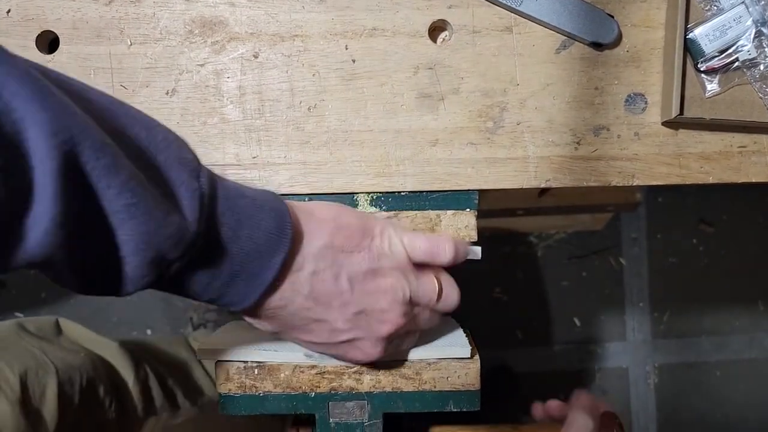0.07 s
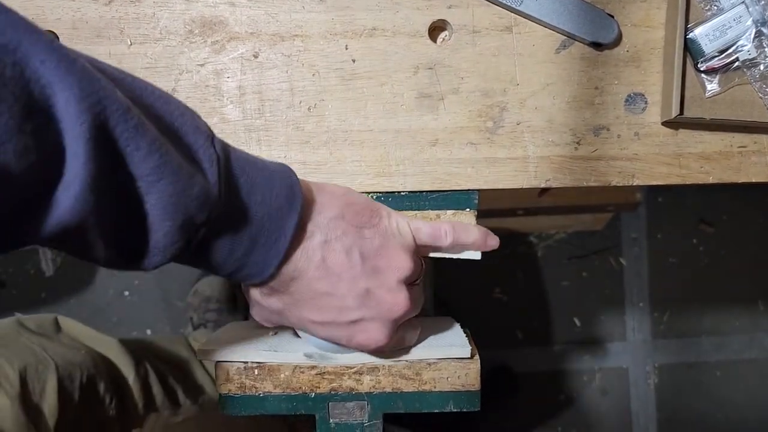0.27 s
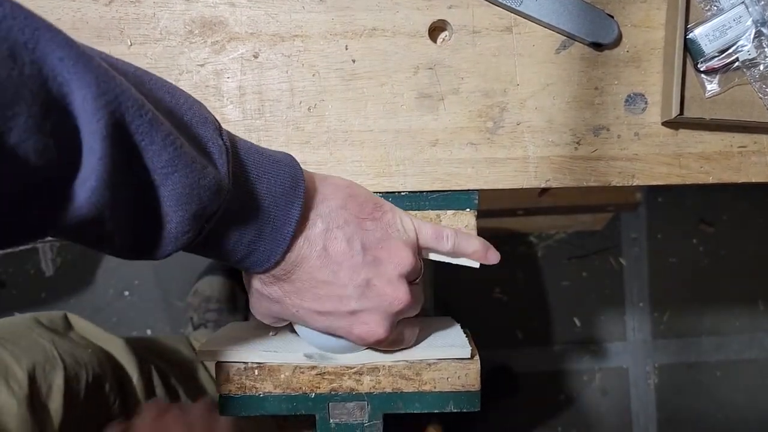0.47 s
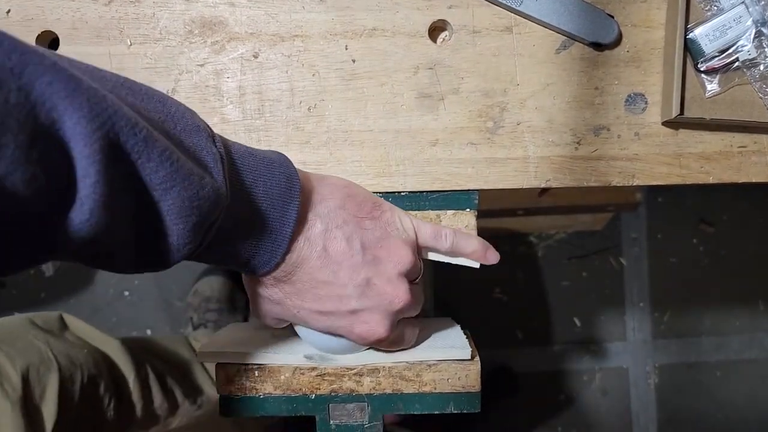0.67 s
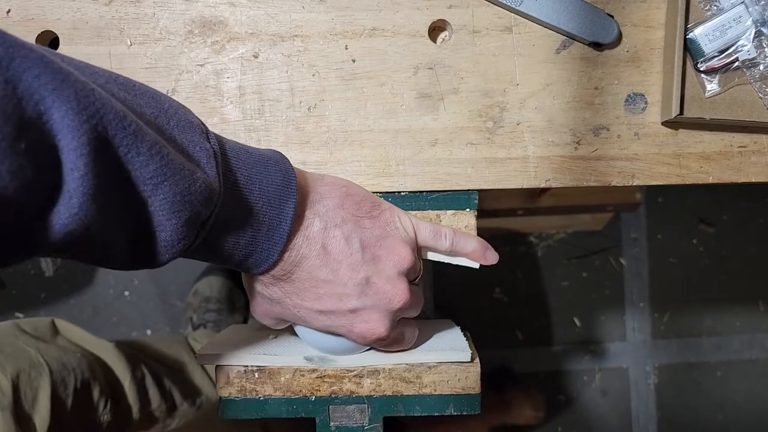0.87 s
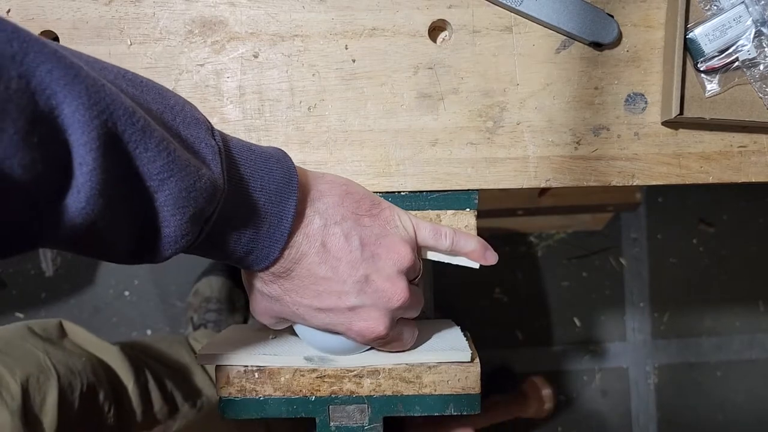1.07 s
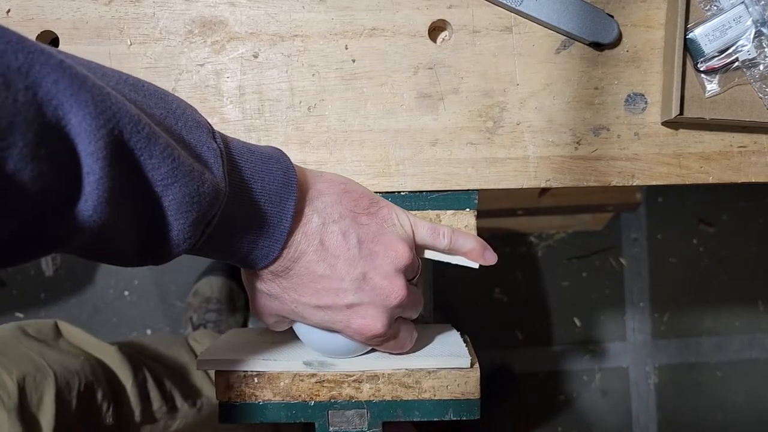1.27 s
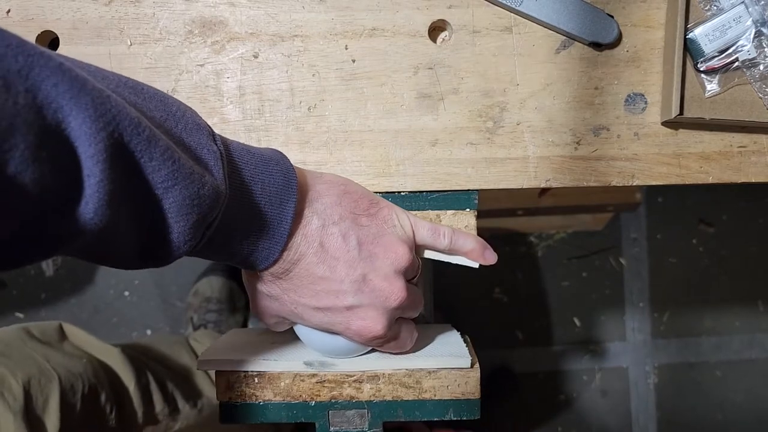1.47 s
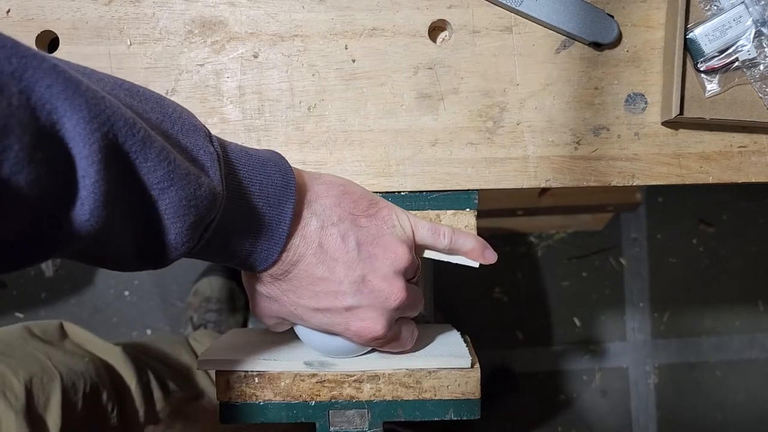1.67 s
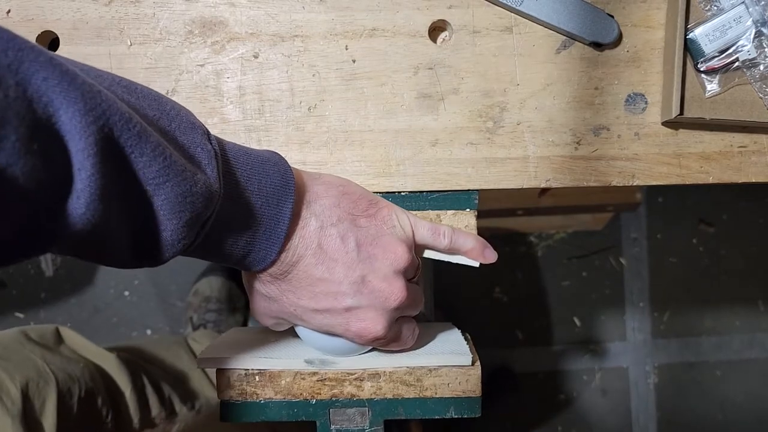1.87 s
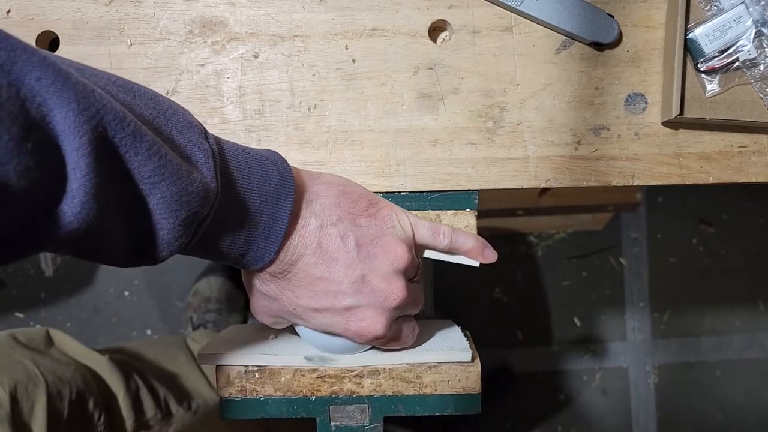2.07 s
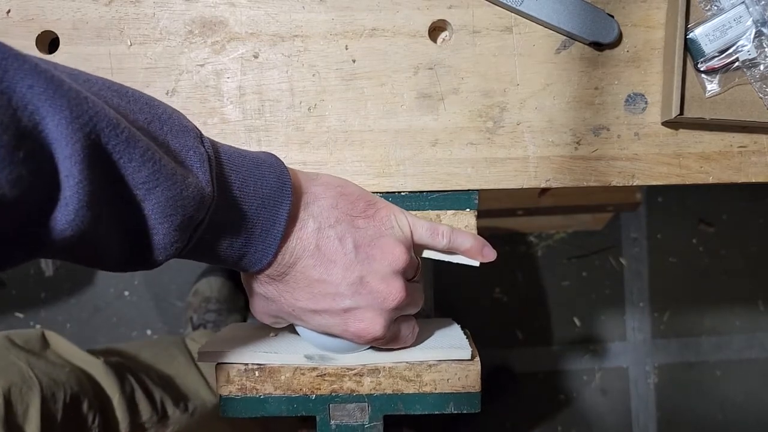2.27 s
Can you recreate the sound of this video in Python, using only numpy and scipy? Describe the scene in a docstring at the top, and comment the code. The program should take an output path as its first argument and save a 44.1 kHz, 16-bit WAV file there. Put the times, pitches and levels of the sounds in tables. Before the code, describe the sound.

A wooden bench vise is wound shut, its loose screw clunking and grinding with a brief high squeak. A hard plastic ball snaps between the jaws, then the grinding fades. A sleeve rustles close by in a small, humming workshop.

```python
"""A wooden bench vise is wound shut on a hard plastic ball in a small workshop.
A sleeve rustles close by over a low steady hum. From 0.2 s the loose screw and jaw clunk and rattle
at each turn and set the bench booming, while the dry thread grinds and squeaks, loudest at 0.75 s.
Between 1.6 and 1.8 s the ball snaps into a new seat three times, its shell ringing briefly.
The grinding then dies away, and one faint knock ends the scene."""
import sys
import numpy as np
from scipy import signal
from scipy.fft import rfft, irfft
from scipy.io import wavfile

SR = 44100
rng = np.random.default_rng(int(sys.argv[2]) if len(sys.argv) > 2 else 0)


def materialize(psi):
    """Save the field psi as 16-bit PCM at rate SR to the path in sys.argv[1].

    A 1-D psi becomes a single channel; in a 2-D psi each row is a channel.
    """
    bounded = np.clip(np.atleast_2d(psi).T, -1, 1)
    quanta = np.round(bounded * 32767).astype(np.int16)
    wavfile.write(sys.argv[1], SR, quanta)


N = 101429

# Knocks of the loose screw and jaw: start_s, thump_db, body_db, clack_db, clack_hz, rattle_s
KNOCKS = [(.216, -45, -29.5, -26.5, 1740, 0.0068), (.226, -24, -22.5, -13.5, 1620, .0025),
          (.251, -41, -28.5, -21.5, 2080, 0.003), (.266, -25, -13, -15.5, 1080, .0024),
          (.293, -25.5, -36.5, -21.5, 1750, 0.0022), (0.459, -34.5, -37, -19, 3050, 0.0026),
          (.478, -21.5, -18.5, -15.5, 1250, 0.0032), (.546, -27, -33, -24.5, 990, 0.003),
          (.792, -29, -48, -33, 1530, 0.0024), (0.826, -32, -46, -40.5, 1010, .0061),
          (.856, -25.5, -36.5, -29, 1310, .0023), (.878, -46, -32.5, -26.5, 1430, 0.0035),
          (.974, -25, -32.5, -24, 1200, .007), (1.021, -31.5, -31, -35.5, 830, 0.0078),
          (1.113, -57, -52, -35, 1060, 0.0018), (1.183, -26.5, -27, -23.5, 1450, 0.0071),
          (1.212, -28.5, -42.5, -34, 1420, 0.0045), (1.229, -25.5, -22.5, -20, 2050, .0035),
          (1.315, -44.5, -35, -38.5, 1270, .0056), (1.392, -33.5, -37.5, -37.5, 800, 0.0015),
          (1.4987, -33.5, -43.5, -21, 1017, 0.0034), (1.54, -33, -44.5, -29, 800, 0.0027),
          (1.56, -29, -29.5, -28.5, 1020, 0.0069), (1.62, -33.5, -27, -17, 1850, 0.0018),
          (1.631, -22, -26, -20, 1210, 0.0072), (1.661, -24, -35, -28, 1600, 0.0073),
          (1.697, -30.5, -30.5, -26, 1760, .005), (1.771, -37.5, -33.5, -19, 2340, .0012),
          (1.802, -46, -37.5, -33, 1420, 0.0074), (1.8373, -33, -30, -23, 1570, 0.0017),
          (1.914, -50.5, -35.5, -39, 1380, 0.00363), (2.239, -43.5, -53.5, -62, 1343, 0.0014)]


def amp(db):
    """Decibels to gain."""
    return 10 ** (np.asarray(db) / 20)


def unit_rms(x):
    """Scales a signal to rms 1."""
    return x / np.sqrt(np.mean(x ** 2) + 1e-20)


def curve_at(points, hz):
    """Reads a curve on a log-frequency axis."""
    f, value = np.transpose(points)
    return np.interp(np.log(hz + 1), np.log(f + 1), value)


def fader(points):
    """Gain over time from points of time_s, level_db."""
    return amp(np.interp(np.arange(N) / SR, *np.transpose(points)))


def add(mix, start_s, sound):
    """Mixes a sound in at its start time."""
    part = mix[..., max(round(start_s * SR), 0):][..., :sound.shape[-1]]
    part += sound[..., :part.shape[-1]]


def convolve(x, response):
    """Plays each channel through an impulse response."""
    return signal.fftconvolve(np.atleast_2d(x), np.atleast_2d(response), axes=1)[:, :N]


def colour(x, eq, peaks=(), size=8192):
    """Minimum-phase EQ of unit energy: a broad curve with resonances on top."""
    hz = abs(np.fft.fftfreq(size, 1 / SR))
    resonances = sum(amp(db) / (1 + (2 * (hz - f) / width) ** 2) for f, width, db in peaks)
    gain = amp(curve_at(eq, hz)) * (1 + resonances)
    response = np.fft.ifft(np.exp(np.conj(signal.hilbert(np.log(gain))))).real[:size // 2]
    return convolve(x, response / np.linalg.norm(response))


def grains(size, spread_db):
    """Mid and side noise made of tiny contacts of uneven strength."""
    return unit_rms(rng.standard_normal((2, size)) * amp(spread_db * rng.standard_normal(size)))


def wander(size, rate_hz):
    """Smooth random motion of rms 1."""
    rolloff = 1 + (np.fft.rfftfreq(size, 1 / SR) / rate_hz) ** 4
    return unit_rms(irfft(rfft(rng.standard_normal(size)) / rolloff, size))


def ring(modes):
    """Impulse response of a set of decaying modes."""
    t = np.arange(SR) / SR
    return sum(amp(db - 60 * t / t60) * np.cos(2 * np.pi * hz * t) for hz, db, t60 in modes)


def room_tone():
    """A low steady hum over the air of the room."""
    # Partials of the hum: pitch_hz, level_db
    hum = [(47, -49.5), (99, -61.5)]
    # Colour of the air: freq_hz, gain_db
    air_eq = [(20, -7), (130, 9), (700, -43), (2000, -69.5), (16000, -50.5)]
    t = np.arange(N) / SR
    out = amp(-59) * colour(rng.standard_normal((2, N)), air_eq)
    out[0] += sum(amp(db) * unit_rms(np.sin(2 * np.pi * (hz * t + rng.random()))) for hz, db in hum)
    return out


def workshop_reverb(send):
    """Reverb of a small room: two noise tails slowly cross-faded so its colour varies."""
    # Decay of the room: freq_hz, t60_s
    decay = [(60, 0.15), (200, 0.36), (4000, 0.47), (16000, 0.12)]
    fade_in = np.minimum(np.arange(SR) / SR / 0.0075, 1)
    out = 0
    for blend in (np.sin, np.cos):
        hz, t, bands = signal.stft(rng.standard_normal((2, SR)), SR, nperseg=256)
        bands *= amp(-60 * t / curve_at(decay, hz)[:, None])
        tail = signal.istft(bands, SR, nperseg=256)[1][:, :SR] * fade_in
        feed = send[0] * blend(np.pi * np.arange(N) / SR)
        out = out + convolve(feed, amp(-13) * tail / np.linalg.norm(tail[0]))
    return out


def sleeve_rustle():
    """Cloth fibres rub with a soft, fluttering hiss."""
    # Swells of the rustle: time_s, level_db
    swells = [(0, -67), (.29, -55.5), (.37, -66), (.53, -58), (.68, -70.5), (.87, -63), (1.29, -60),
              (1.38, -80), (1.49, -86), (1.68, -50.5), (1.8, -90.5), (1.85, -59.5), (1.99, -61),
              (2.09, -70.5), (2.3, -72.5)]
    # Colour of the cloth: freq_hz, gain_db
    cloth_eq = [(200, 10), (2000, 2.5), (7500, 3.5), (16000, -11.5)]
    flutter = unit_rms(amp(0.62 * wander(N, rate_hz=41)))
    return colour(grains(N, spread_db=2) * flutter * fader(swells), cloth_eq)


def screw_grind():
    """The turning screw grinds unevenly through the bench."""
    # Swells of the grinding: time_s, level_db
    swells = [(0, -79), (.2, -51), (.3, -32), (.42, -39.5), (.58, -31.5), (.73, -38.5), (.87, -35.5),
              (1.28, -39), (1.48, -51), (1.58, -31.5), (1.98, -38), (2.08, -54), (2.3, -58.5)]
    # Colour of the grinding: freq_hz, gain_db
    grind_eq = [(40, -35), (95, -5.5), (180, 1.5), (250, -12.5), (370, -8), (700, -21), (2000, -34),
                (16000, -77)]
    judder = unit_rms(amp(3.26 * wander(N, rate_hz=47)))
    return colour(grains(N, spread_db=4) * judder * fader(swells), grind_eq)


def thread_squeaks():
    """The dry thread sings briefly; the louder squeaks sag in pitch as it lets go."""
    # Squeaks: peak_s, pitch_hz, level_db, rise_s, fall_s, sag_hz
    squeaks = [(0.306, 3227, -39, 0.0022, .004, 3), (.646, 3210, -49, 0.0048, 0.011, -4),
               (.674, 12100, -59, 0.00299, 0.0047, 2), (.754, 3205, -18, 0.011, .014, 59),
               (0.8314, 3204, -26, 0.0036, 0.0033, 164.5)]
    # Harmonics, from the fundamental up: level_db
    harmonics = [-7.5, -34, -51.5]
    out, t = np.zeros((2, N)), np.arange(-2048, 2048) / SR
    for peak_s, hz, db, rise_s, fall_s, sag_hz in squeaks:
        jitter = .0035 * wander(len(t), rate_hz=260)
        pitch = hz * (1 + jitter) - sag_hz * np.clip(t / fall_s, 0, 1.3) ** 2
        phase = 2 * np.pi * np.cumsum(pitch) / SR
        tone = sum(gain * np.sin(k * phase) for k, gain in enumerate(amp(harmonics), 1))
        swell = np.exp(-abs(t / np.where(t < 0, rise_s, fall_s)) ** 1.61)
        add(out, peak_s + t[0], amp(db) * unit_rms(tone) * swell * np.array([[1], [.2]]))
    return out


def edge_ticks():
    """Hard edges catch with short bright ticks."""
    # Ticks: start_s, level_db, decay_s
    ticks = [(0.2242, -35.5, .004), (0.2538, -29, 0.00093), (0.27, -39.5, 0.0074), (.4592, -43, .0015),
             (0.48, -39.5, 0.019), (.858, -40, 0.0053), (0.876, -47.5, 0.011), (1.2318, -35, 0.0022),
             (1.64, -44.5, 0.023), (2.2395, -53, 0.0032)]
    # Colour of a tick: freq_hz, gain_db
    tick_eq = [(1500, -17), (6200, 0.5), (9000, -10.5), (16000, -20)]
    out, t = np.zeros((2, N)), np.arange(SR) / SR
    for start_s, db, decay_s in ticks:
        add(out, start_s, amp(db) * grains(SR, spread_db=4) * np.exp(-t / decay_s))
    return colour(out, tick_eq)


def washer_chinks():
    """A steel washer chatters on one high mode as it shifts."""
    # Chinks: start_s, level_db
    chinks = [(0.873, -37.5), (1.665, -41), (1.717, -45.5), (1.847, -47.5)]
    out, steel = np.zeros((2, N)), ring([(7320, 0, .08)])
    for start_s, db in chinks:
        chatter = np.array([wander(SR, rate_hz=130) for _ in out])
        add(out, start_s, amp(db) * steel * chatter)
    return out


def ball_slips():
    """The ball snaps into a new seat and its hard shell rings; a shorter contact sounds sharper."""
    # Slips between the jaws: start_s, level_db, contact_s
    slips = [(1.6401, -8, 0.00044), (1.702, -22.5, .0005), (1.774, -16.5, 0.00041)]
    # Modes of the shell: pitch_hz, level_db, t60_s
    shell_modes = [(1605, -5.5, 0.063), (1738, 15, 0.0091), (1980, 10, 0.021), (3250, 1.5, 0.025)]
    out, t = np.zeros((2, N)), np.arange(SR) / SR
    shell = ring(shell_modes) * np.minimum(t / 0.0023, 1)
    for start_s, db, contact_s in slips:
        blow = np.sin(np.pi * np.minimum(t / contact_s, 1)) ** 2
        add(out[:1], start_s, amp(db) * convolve(blow / blow.sum(), shell))
    return out


def bench_boom():
    """Each knock pushes the bench, which booms in its low modes."""
    # Modes of bench and jaw: pitch_hz, level_db, t60_s
    bench_modes = [(96.6, -0.5, 0.16), (138.4, 0, 0.15), (170.5, -5, 0.24), (180.4, -2, 0.36),
                   (338, -5.5, 0.23), (384.5, -4, 0.4), (509.3, 4.5, 0.095)]
    push_s = 0.0023
    pushes, t = np.zeros(N), np.arange(512) / SR
    pulse = np.sin(np.pi * np.minimum(t / push_s, 1)) ** 2
    for start_s, thump_db, *_ in KNOCKS:
        add(pushes, start_s, amp(thump_db) * pulse / pulse.sum())
    return convolve(pushes, ring(bench_modes)) * np.array([[1], [0]])  # mid only


def vise_knocks():
    """The loose screw and jaw clunk: a hard contact in a short rattle, with quick echoes off the bench."""
    # Colour of the wooden body: freq_hz, gain_db
    body_eq = [(30, -40.5), (200, -5), (310, 1.5), (700, 1), (1600, -26), (16000, -94.5)]
    # Colour of the clack: freq_hz, gain_db
    clack_eq = [(100, -51.5), (500, 19.5), (2100, 5.5), (2550, 2.5), (3700, -1), (5000, -9.5),
                (16000, -26.5)]
    # Ring of the wooden jaws: pitch_hz, width_hz, gain_db
    jaw_peaks = [(327.4, 68, 4.5), (666.6, 25, 1.5), (934, 40, -4), (1427, 30, -9)]
    echo_t60_s, contact_share = 0.11, 0.25
    bodies, clacks = np.zeros((2, 2, N))
    t = np.arange(6000) / SR
    for start_s, _, body_db, clack_db, clack_hz, rattle_s in KNOCKS:
        rattle = t / rattle_s * np.exp(1 - t / rattle_s)
        echoes = unit_rms(amp(-60 * t / echo_t60_s) * np.minimum(t / rattle_s / 2, 1))
        echoes *= amp(1) * np.sqrt(np.mean(rattle ** 2))  # 1 dB more energy than the rattle
        burst = grains(len(t), spread_db=4) * np.hypot(rattle, echoes)
        burst[0, int(rattle_s * SR / 2)] -= contact_share * np.linalg.norm(rattle)
        clack = signal.lfilter(*signal.iirpeak(clack_hz, Q=1.17, fs=SR), burst)
        add(bodies, start_s, amp(body_db) * burst)
        add(clacks, start_s, amp(clack_db + 1) * clack)
    return colour(bodies, body_eq, jaw_peaks) + colour(clacks, clack_eq, jaw_peaks)


def scene():
    """Mixes the sources and the room in mid and side, then spreads them to left and right."""
    # Stereo width: freq_hz, side_db
    width = [(170, -23), (350, -12.5), (700, -2), (2300, -1.5), (5000, 0)]
    # Stereo balance: freq_hz, left_over_right_db
    balance = [(100, 0.5), (700, -2.5), (2000, -1), (5500, -3), (14000, 2.5)]
    clatter = vise_knocks() + edge_ticks() + washer_chinks()
    boom, squeaks = bench_boom(), thread_squeaks()
    reverb = workshop_reverb(clatter + amp(10) * boom + amp(1.5) * squeaks)
    vise = amp(-1.5) * (clatter + ball_slips() + boom + reverb)
    mid, side = rfft(vise + squeaks + screw_grind() + sleeve_rustle() + room_tone(), 2 * N)
    hz = np.fft.rfftfreq(2 * N, 1 / SR)
    side *= amp(curve_at(width, hz))
    lean = amp(curve_at(balance, hz) / 2)
    return irfft([(mid + side) * lean, (mid - side) / lean])[:, :N]


def record(dry):
    """A steep low-pass trims the highest treble."""
    lowpass = signal.firwin(511, cutoff=15850, window=("kaiser", 9), fs=SR)
    return signal.oaconvolve(dry, lowpass[None], "same")


dry = scene()
out = record(dry)
materialize(out)
```